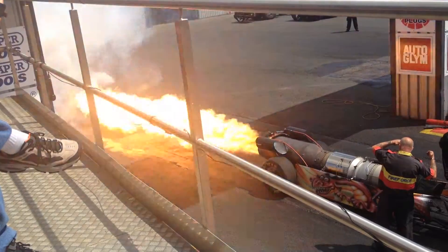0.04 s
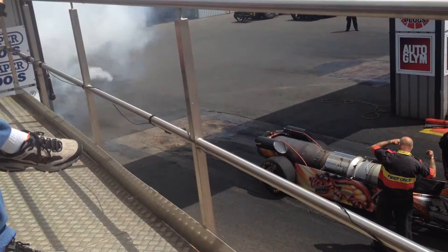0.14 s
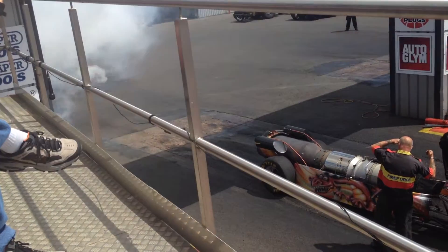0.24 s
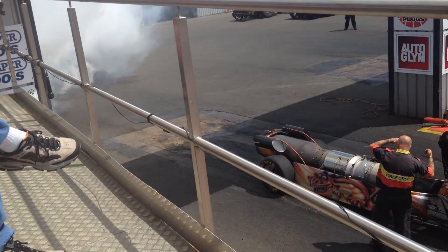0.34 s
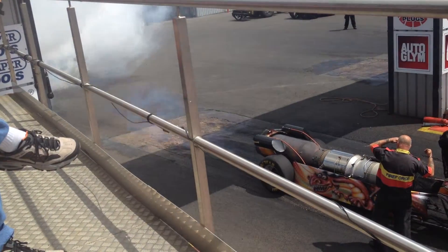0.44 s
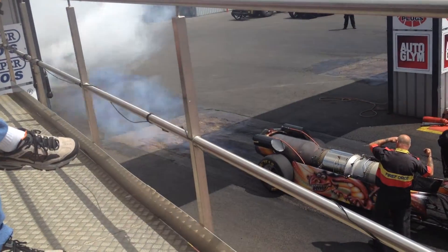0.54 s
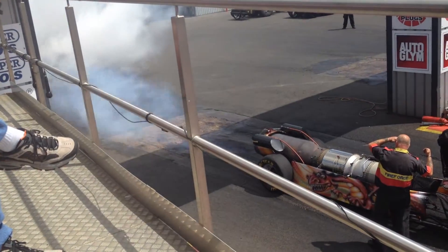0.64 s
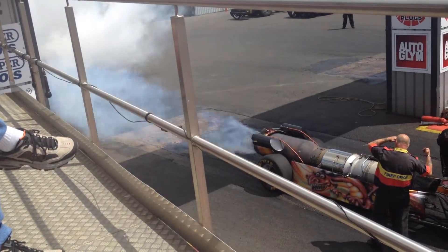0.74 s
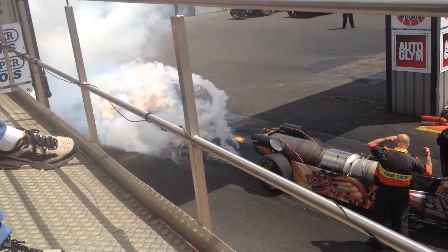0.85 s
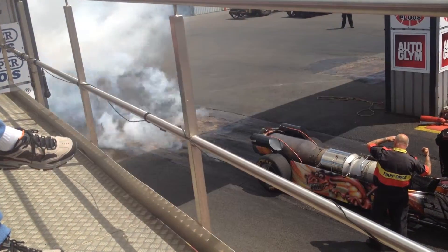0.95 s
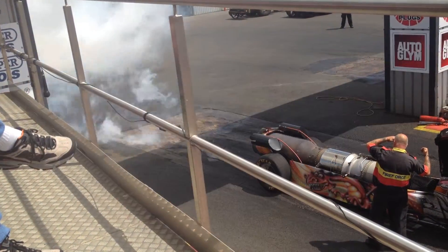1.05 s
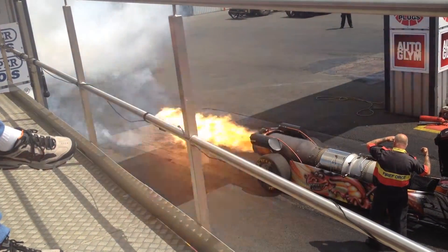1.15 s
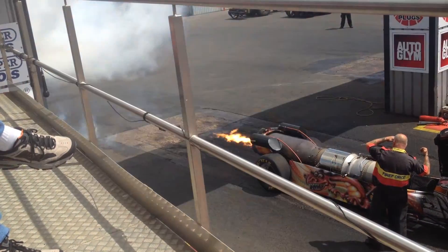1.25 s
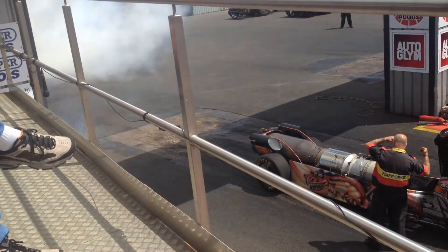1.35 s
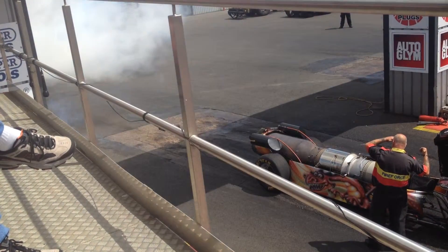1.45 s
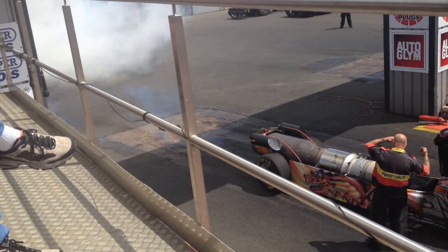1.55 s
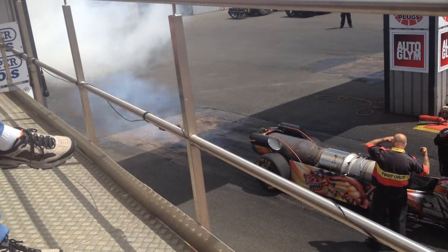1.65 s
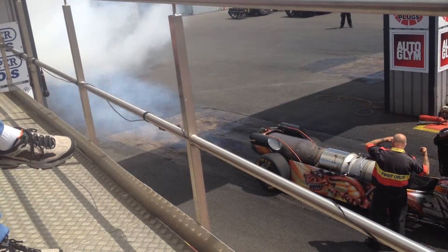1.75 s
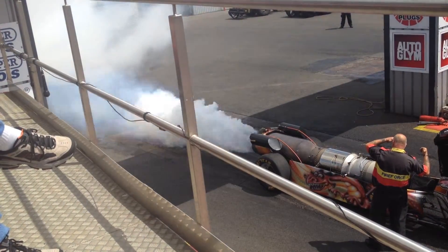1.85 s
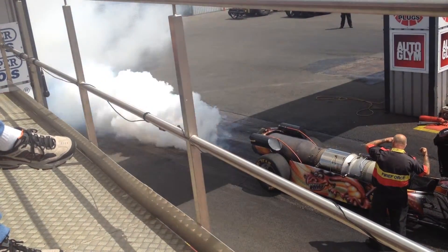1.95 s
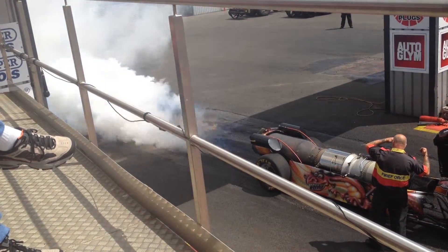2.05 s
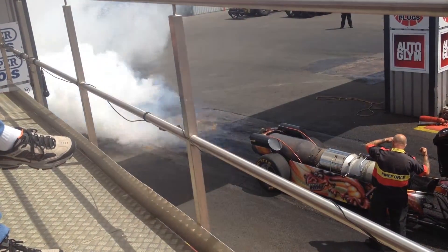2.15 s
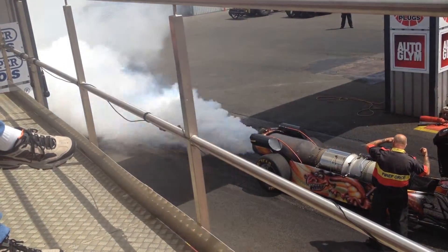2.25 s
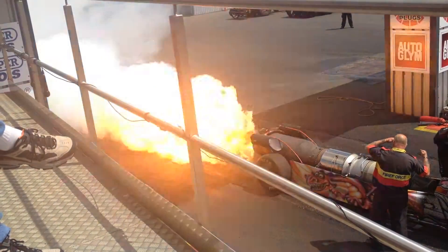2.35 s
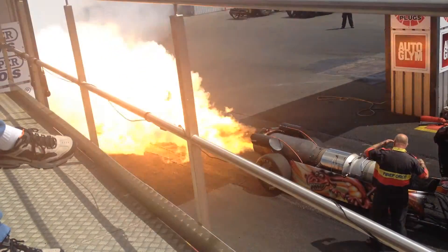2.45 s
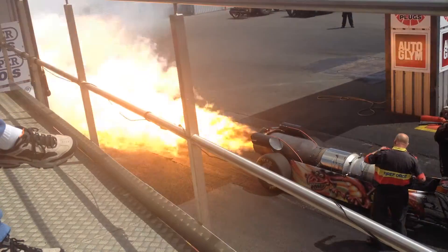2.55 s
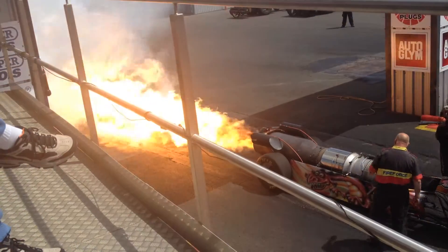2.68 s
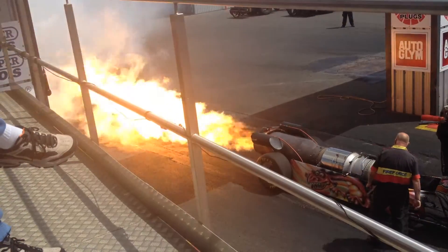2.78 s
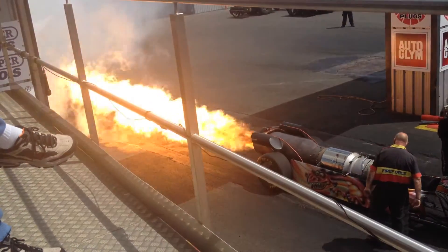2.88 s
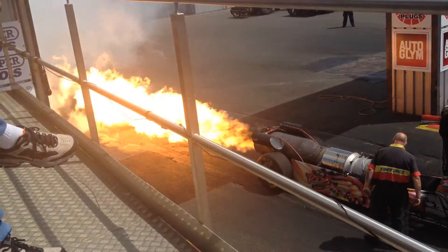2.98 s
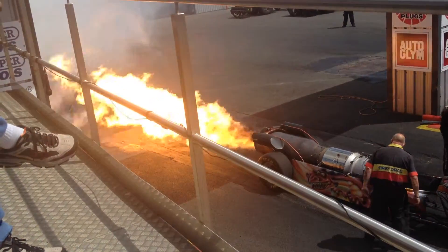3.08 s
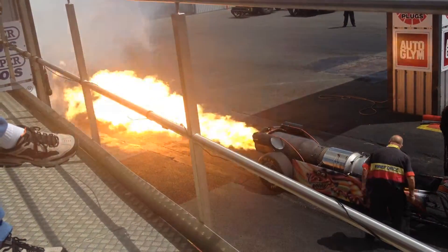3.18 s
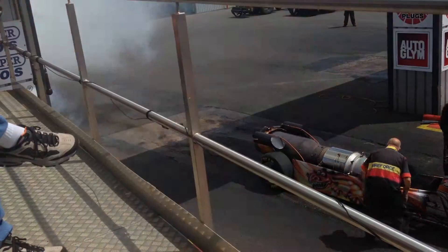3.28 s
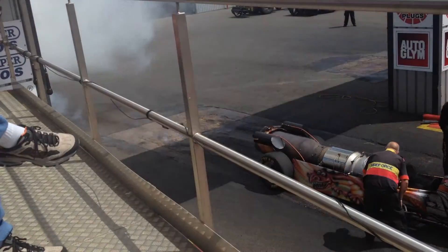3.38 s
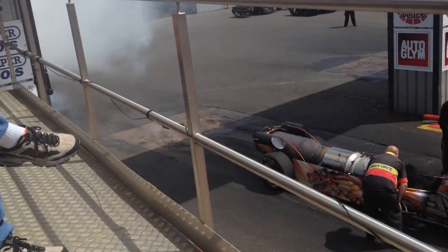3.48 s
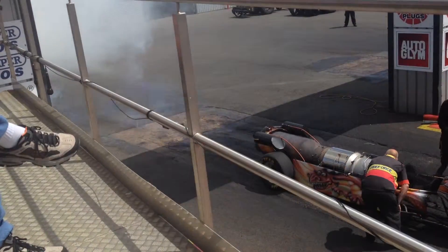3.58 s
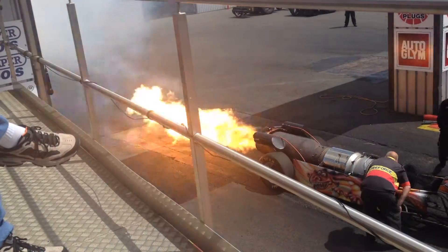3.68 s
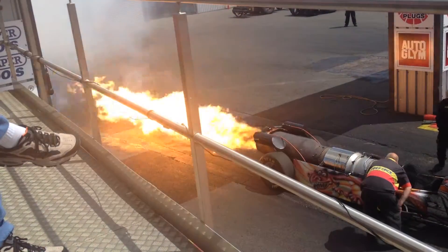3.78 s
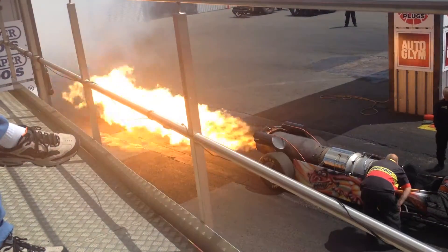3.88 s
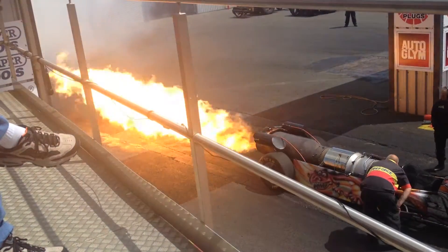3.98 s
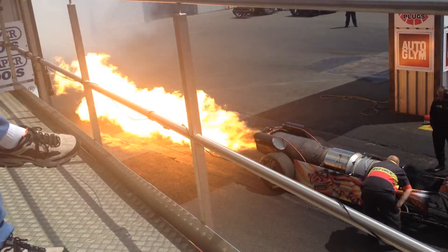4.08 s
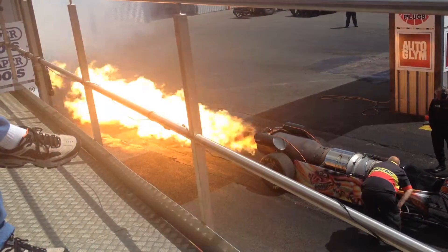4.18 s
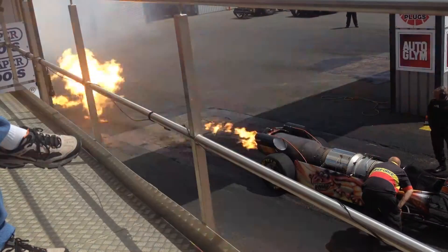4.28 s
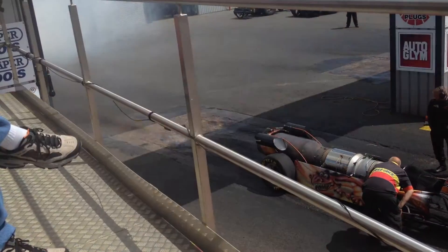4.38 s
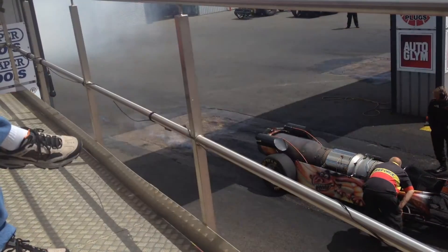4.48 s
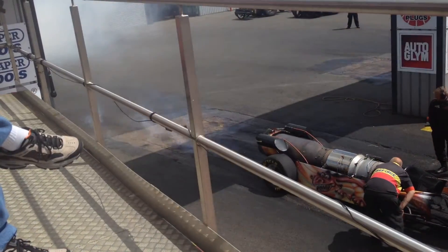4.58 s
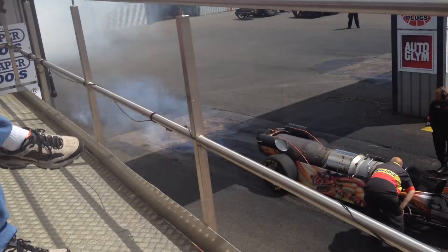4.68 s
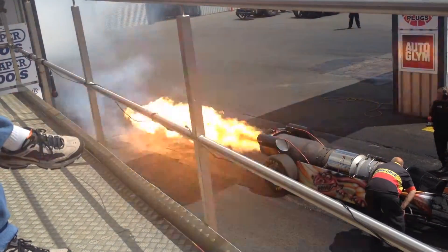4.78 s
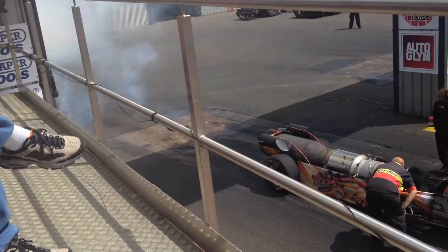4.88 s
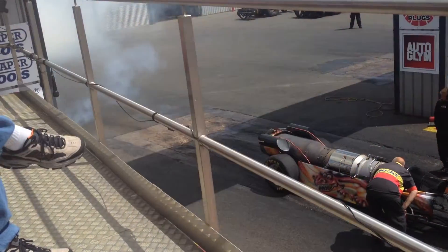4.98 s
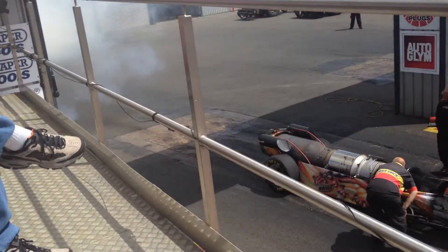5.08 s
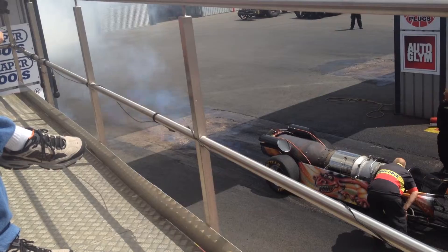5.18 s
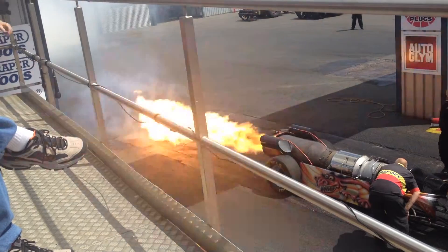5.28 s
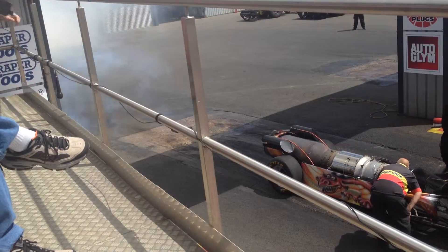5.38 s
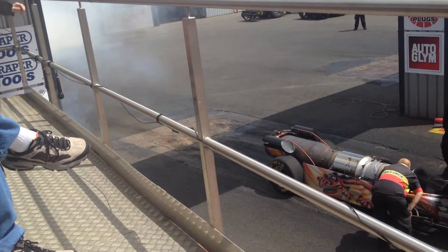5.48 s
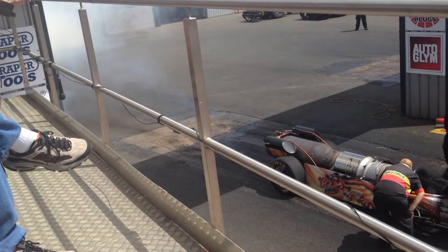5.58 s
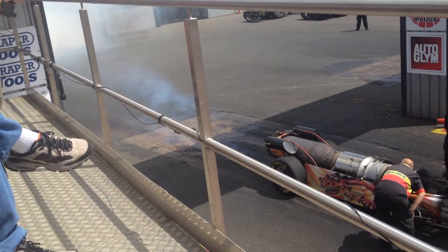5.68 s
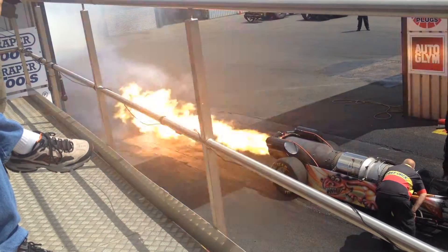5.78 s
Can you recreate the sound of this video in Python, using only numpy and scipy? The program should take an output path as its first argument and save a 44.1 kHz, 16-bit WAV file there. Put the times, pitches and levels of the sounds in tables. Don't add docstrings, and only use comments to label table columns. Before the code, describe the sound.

Outdoors and close by, a jet-powered car idles with a piercing blade whistle, rushing intake hiss and fluttering howl. It opens mid-burn, then gives two quick bursts, two long lumpy roars and several short bursts to the end. Each ignition thumps the tail pipe. A small mono microphone with gain control ducks the turbine under the flame and clips softly on peaks.

```python
import sys
import numpy as np
from scipy import signal
from scipy.fft import rfft, irfft, next_fast_len
from scipy.io import wavfile
from scipy.ndimage import uniform_filter1d, minimum_filter1d, map_coordinates

SR = 44100
rng = np.random.default_rng(int(sys.argv[2]) if len(sys.argv) > 2 else 0)


def generate_wav(sig):
    pcm = np.round(np.clip(np.atleast_2d(sig).T, -1, 1) * 32767).astype(np.int16)
    wavfile.write(sys.argv[1], SR, pcm)


def volts_from_db(level):
    exponent = np.asarray(level, float) / 20
    return 10 ** exponent


N = 257103

# pitch_hz, level_db [dB per Hz]
INTAKE_HISS = [(500, -37), (850, -13.5), (1560, -4), (2110, -13), (2750, -5), (2860, -13.5), (3070, -5.5),
               (4370, -16.5), (5500, -13.5), (5700, -8), (6590, -7), (7810, -7.5), (9720, -20.5),
               (10800, -19.5), (15400, -20)]
# pitch_hz, level_db [dB per Hz]
IDLE_EXHAUST = [(12, -49), (20, -11), (108, -13.5), (136, -16), (188, 2), (511, -7.5), (622, -0.5),
                (921, -9), (1000, -26), (1300, -31), (2200, -120)]
# start_s, blade_rate_hz
SPOOL = [(0, 2920), (.18, 2903), (.5, 2895), (.85, 2930), (1.0, 2916), (1.2, 2928), (1.37, 2927),
         (1.8, 2950), (2.42, 2944), (3.32, 2853), (3.74, 2880), (4.1, 2876), (4.5, 2855), (4.8, 2894),
         (4.95, 2888), (5.35, 2917), (5.46, 2908), (5.83, 2940)]
# shaft_order, width_hz, level_db
HIGH_HOWL = [(6.2, 45, -4.5), (6.45, 45, 3), (6.72, 45, -1.5)]
# centre_s, half_length_s, low_band_db, high_band_db
GUSTS = [
    (1.678, .07, 8.5, -1),
    (0.759, 0.036, 5, 7),
    (1.14, 0.027, 0, 7),
    (2.0, 0.12, 2, 3),
    (2.27, 0.058, 7.5, -3),
    (2.583, 0.042, 15, 0),
    (3.04, 0.059, 8.5, 1),
    (3.581, 0.067, 4.5, 4),
    (4.054, 0.041, 6, 9),
    (4.622, 0.098, 2, 2),
]
# shaft_order, level_db, share of the ducking
STRONG_TONES = [(12, -24.5, 0.55), (24, -24.5, 1), (31, -25, 0.54), (36, -27.5, 0.77)]
# shaft_order, level_db
WEAK_TONES = [(33, -38), (38, -50), (43, -35), (45, -46), (46, -50), (48, -36), (55, -45), (57, -53),
              (60, -51)]
# centre_s, shaft_order, half_length_s, gain_db
TONE_SWELLS = [(.54, 12, 0.22, 7.5), (1.894, 12, 0.43, 5.5), (2.4, 12, 0.096, 7), (3.36, 12, 0.09, 8),
               (4.694, 12, 0.19, 2), (5.244, 12, 0.19, 10), (5.577, 12, 0.17, 9.5),
               (0.403, 24, 0.086, 10.5), (0.866, 24, 0.054, 7.5), (1.58, 24, 0.13, 11),
               (1.302, 24, 0.083, 5), (2.3, 24, 0.22, 5.5), (2.667, 24, 0.14, 5), (3.67, 24, 0.042, 5.5),
               (5.168, 24, .15, 4.5), (5.627, 24, 0.091, 4), (.66, 31, 0.18, 4), (1.2, 31, .06, -3),
               (1.483, 31, .05, -3), (1.9, 31, .15, 8), (2.24, 31, 0.14, 7.5), (3.2, 31, .1, 8),
               (5.3, 31, 0.045, 1), (1.163, 36, 0.055, 7.5), (1.467, 36, 0.057, 9), (1.899, 36, 0.099, 1),
               (2.38, 36, .07, 4), (3.607, 36, 0.1, 6.5), (4.2, 36, .12, 5), (4.804, 36, .06, 6)]
# start_s, rise_s, fuel_flow_s, boom_db, rasp_db
BURNS = [
    (-.01, 0.024, 0.23, -9.5, -16.5),
    (.885, 0.039, 0.16, -8.5, -19),
    (1.21, 0.075, .13, -10, -13.5),
    (2.425, 0.022, .88, -7.5, -15.5),
    (3.7, 0.082, 0.68, -9, -17.5),
    (4.805, 0.087, 0.15, -10.5, -14),
    (5.33, .035, .12, -10.5, -14),
    (5.8, .025, .1, -15, -18),
]
# start_s, thump_db, pipe_hz
LIGHT_UPS = [
    (.931, 0, 179),
    (1.233, -11, 201.8),
    (2.444, 2.5, 147),
    (3.758, -11, 169),
    (4.86, -17, 199),
    (5.349, -5.5, 148.6),
    (5.817, -3, 169.4),
]
# start_s, thump_db, pipe_hz
POPS = [(.12, -7, 200), (.985, -2, 260), (1.04, 3.5, 185), (1.32, -0.5, 201), (2.52, -20, 194.7),
        (2.731, -1, 202.6), (2.896, 3.5, 213), (3.19, 3, 199), (3.809, -6, 202), (4.19, -5, 213),
        (4.946, 2.5, 268), (5.42, -13, 260)]
# pitch_hz, level_db [dB per Hz]
BOOM = [(12, -50), (25, -40), (60, -48), (85, -14), (115, -3.5), (140, -5.5), (165, -0.5), (190, 0.5),
        (230, -2.5), (275, 0.5), (310, -3.5), (340, -7), (480, -13), (620, -36), (1060, -120)]
# pitch_hz, level_db [dB per Hz]
RASP = [(350, -18), (480, -2.5), (620, 1), (760, 0), (900, -8), (1300, -7.5), (2500, -10.5), (4500, -19),
        (9000, -26)]
# pitch_hz, level_db
CAPSULE = [(8300, 0), (9000, 1.5), (9450, -6.5), (9900, 1), (10600, 2.5), (14000, 0.5), (15000, 1)]
# pitch_hz, level_db
MASKING = [(8500, -60), (9000, -23), (9800, -23), (10200, -27), (12000, -22), (13000, -17), (15000, -14)]

BOOM_IDLE_DB, RASP_IDLE_DB = -34, -34
BOOM_FALL_DB_PER_S, RASP_FALL_DB_PER_S = 78, 140


def unit(x):
    return x / np.sqrt(np.mean(x ** 2) + 1e-20)


def wobble(rate):
    coarse = np.arange(0, N + 16, 16)
    knots = rng.standard_normal(int(N * rate / SR) + 4)
    return np.interp(np.arange(N), coarse, map_coordinates(knots, [coarse * rate / SR]))


def swell(s, half_s):
    return np.exp(-((np.arange(N) / SR - s) / half_s) ** 2)


def coloured(x, points):
    m = next_fast_len(N + 8192)
    hz, db = np.transpose(points)
    log_hz = np.log(np.fft.rfftfreq(m, 1 / SR) + 1)
    gain = volts_from_db(np.interp(log_hz, np.log(hz + 1), db))
    return irfft(rfft(x, m) * gain, m)[..., :N]


def rush(points, patchy_db):
    z = signal.stft(rng.standard_normal(N + 512), nperseg=512)[2]
    field = uniform_filter1d(rng.standard_normal(z.shape), size=8, axis=0)
    field = uniform_filter1d(field, size=12, axis=1)
    patchy = signal.istft(z * volts_from_db(patchy_db * unit(field)), nperseg=512)[1][:N]
    return unit(coloured(patchy, points))


def flame_db(column, fall_db_per_s, idle_db):
    rise_db, sag_db_per_s = 24, 1.5
    rows = np.array(BURNS)[:, :, None]
    age = np.arange(N) / SR - rows[:, 0]
    rise, flow = rows[:, 1], rows[:, 2]
    climb = rise_db * np.minimum(age / rise - 1, 0)
    sag = sag_db_per_s * np.clip(age, 0, flow)
    fall = fall_db_per_s * np.maximum(age - flow, 0)
    level = rows[:, column] + climb - sag - fall
    return 10 * np.log10(np.sum(volts_from_db(2 * level), axis=0) + volts_from_db(2 * idle_db))


def ducking():
    duck_db, thump_duck_db = 2.5, 8
    ahead_s, recover_s = 0.007, 0.045
    t = np.arange(N) / SR
    boom_db = flame_db(column=3, fall_db_per_s=BOOM_FALL_DB_PER_S, idle_db=BOOM_IDLE_DB)
    thumps = np.zeros(N)
    for s, db, _ in LIGHT_UPS:
        thumps += volts_from_db(db) * (t > s - ahead_s) * np.exp(-np.maximum(t - s, 0) / recover_s)
    under_roar = duck_db * np.tanh(0.99 * volts_from_db(boom_db - boom_db.max()))
    return -under_roar - thump_duck_db * uniform_filter1d(thumps, size=80)


def shaft_angle():
    blades = 12
    start_s, blade_rate_hz = np.transpose(SPOOL)
    blade_rate = np.interp(np.arange(N) / SR, start_s, blade_rate_hz)
    speed = uniform_filter1d(blade_rate, size=3000) / blades * (1 + 0.000573 * wobble(25))
    return 2 * np.pi * np.cumsum(speed) / SR


def intake_hiss(air_db):
    return volts_from_db(air_db + 9.0 + 0.65 * wobble(30)) * rush(INTAKE_HISS, patchy_db=0.73)


def idle_exhaust(air_db):
    return volts_from_db(air_db - 8.5) * rush(IDLE_EXHAUST, patchy_db=3.0)


def howl(angle, duck_db):
    low_db = -28 + 0.4 * duck_db + sum(low * swell(s, half) for s, half, low, _ in GUSTS)
    high_db = -22 + 0.36 * duck_db + sum(high * swell(s, half) for s, half, _, high in GUSTS)
    loose_angle = angle + np.cumsum(0.007 * wobble(12)) * np.mean(np.diff(angle))

    def band(order, width_hz):
        in_phase = wobble(width_hz) * np.sin(order * loose_angle)
        return in_phase + wobble(width_hz) * np.cos(order * loose_angle)

    high = unit(sum(volts_from_db(db + 1.5 * wobble(11)) * band(order, width) for order, width, db in HIGH_HOWL))
    return volts_from_db(low_db) * unit(band(5.94, 30)) + volts_from_db(high_db) * high


def whistle(angle, duck_db):
    def tone(order, db):
        flicker = volts_from_db(db + 2.16 * wobble(35))
        return flicker * np.sqrt(2) * np.sin(order * angle + 0.5 * wobble(45))

    def focus(order):
        return sum(db * swell(s, half) for s, k, half, db in TONE_SWELLS if round(k) == order)

    total = np.zeros(N)
    for k, db, share in STRONG_TONES:
        order = round(k)
        total += tone(order, db + share * duck_db + focus(order) + 0.88 * wobble(9))
    weak_focus = 0.7 * focus(36)
    for order, db in WEAK_TONES:
        total += tone(order, db + 2.5 + 1.2 * duck_db + weak_focus + 2.5 * wobble(8))
    return total


def afterburner():
    light_t60_s, pop_t60_s = 0.12, 0.1
    boom_db = flame_db(column=3, fall_db_per_s=BOOM_FALL_DB_PER_S, idle_db=BOOM_IDLE_DB)
    rasp_db = flame_db(column=4, fall_db_per_s=RASP_FALL_DB_PER_S, idle_db=RASP_IDLE_DB)
    lumps = wobble(40) * np.tanh(1.9 * volts_from_db(rasp_db - rasp_db.max() + 4.5) + 0.15)
    boom = unit(volts_from_db(4.1 * lumps) * rush(BOOM, patchy_db=0.5))
    shocks = rng.standard_normal(N) * volts_from_db(2.2 * lumps + 3.1 * wobble(300))
    rasp = unit(coloured(shocks, RASP))
    flame = volts_from_db(boom_db + 1.0) * boom + volts_from_db(rasp_db + 6.0) * rasp

    t = np.arange(SR // 4) / SR
    rings = [(*row, light_t60_s) for row in LIGHT_UPS] + [(*row, pop_t60_s) for row in POPS]
    for s, db, hz, t60 in rings:
        phase = 2 * np.pi * hz * t + 1.76 * wobble(53.0)[:len(t)]
        ring = volts_from_db(db + 3.5 - 60 * t / t60) * np.sin(phase) * np.tanh(t / 0.004)
        start = round(s * SR)
        flame[start:][:len(t)] += ring[:N - start]
    return flame


def scene():
    angle, duck_db = shaft_angle(), ducking()
    air_db = -22.5 + duck_db + 0.8 * wobble(3.65)
    turbine = intake_hiss(air_db) + idle_exhaust(air_db) + howl(angle, duck_db) + whistle(angle, duck_db)
    return np.tile(turbine + afterburner(), (2, 1))


def limiter(mono):
    need = np.minimum(1, 0.89 / (np.abs(mono) + 1e-6))
    gain = uniform_filter1d(minimum_filter1d(need, size=440), size=120) ** 0.57
    ducked = gain * mono
    return ducked / (1 + np.abs(ducked / 0.64) ** 4) ** (1 / 4)


def lose_masked_treble(x):
    hz, _, z = signal.stft(x, SR, nperseg=1024)
    power = np.abs(z) ** 2
    steady = uniform_filter1d(power, size=3, axis=1)
    cell = uniform_filter1d(uniform_filter1d(power, size=4, axis=0), size=3, axis=1)
    strongest = -minimum_filter1d(-steady, size=70, axis=0)
    margin = volts_from_db(2 * np.interp(hz, *np.transpose(MASKING)))
    kept = cell > strongest * margin[:, None]
    return signal.istft(z * kept, SR, nperseg=1024)[1][:N]


def top_cut(x):
    return signal.sosfilt(signal.butter(12, 15700, fs=SR, output="sos"), x)


def record(dry):
    heard = coloured(limiter(dry[0]), CAPSULE)
    low_pass = signal.ellip(12, 0.5, 80, 15290, fs=SR, output="sos")
    mono = lose_masked_treble(signal.sosfilt(low_pass, heard))
    return top_cut(np.tile(mono, (2, 1)))


dry = scene()
out = record(dry)
generate_wav(out)
```